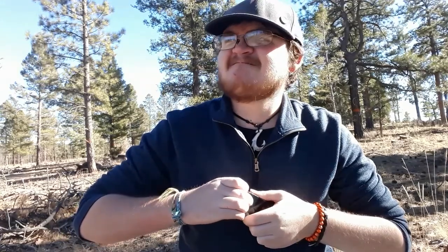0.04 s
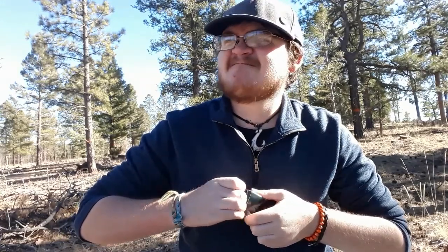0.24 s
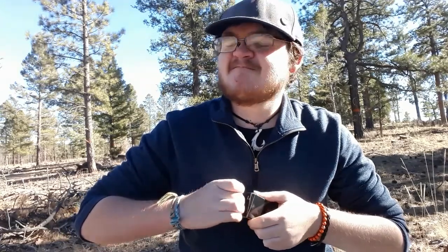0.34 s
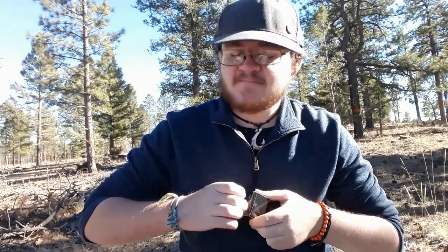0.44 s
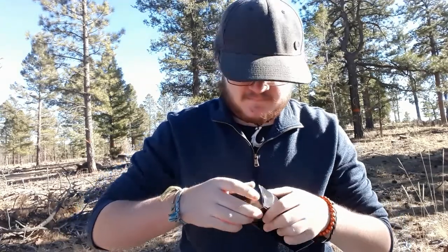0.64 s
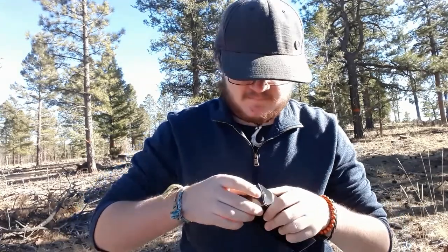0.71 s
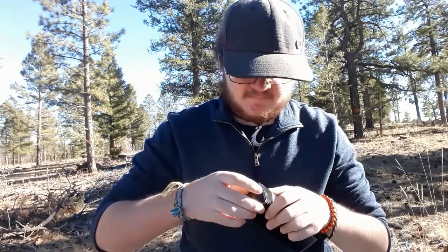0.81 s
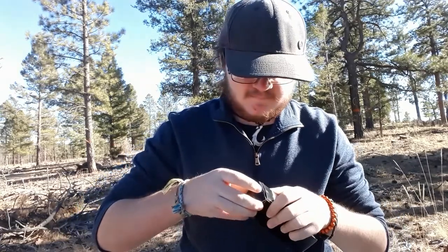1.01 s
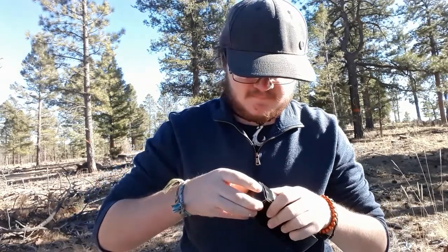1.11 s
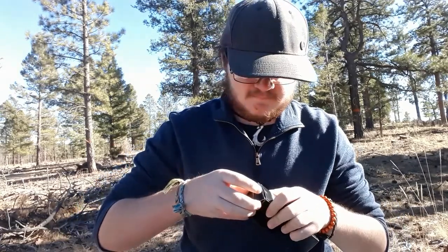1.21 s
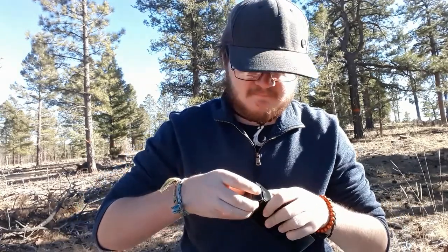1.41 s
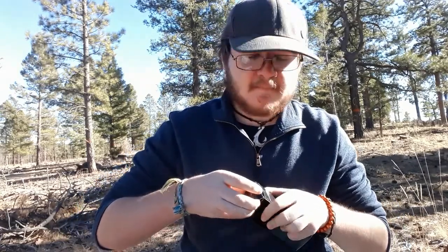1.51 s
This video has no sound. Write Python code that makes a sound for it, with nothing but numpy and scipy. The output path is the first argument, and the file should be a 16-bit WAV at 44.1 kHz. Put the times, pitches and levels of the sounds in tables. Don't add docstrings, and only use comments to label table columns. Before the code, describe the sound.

Fingers pry a little metal tin at arm's length outdoors: one crisp snap, a rapid clatter with a hard pop, a long lull with light wind rumble and thin hiss, then a last softer tinny snap.

```python
import sys
import numpy as np
from scipy import signal
from scipy.fft import rfft, irfft, next_fast_len
from scipy.io import wavfile
from scipy.ndimage import uniform_filter1d, map_coordinates

SR = 44100
rng = np.random.default_rng(int(sys.argv[2]) if len(sys.argv) > 2 else 0)


def transcribe(signal):
    frames = np.atleast_2d(signal).T
    limited = np.clip(frames, -1, 1)
    pcm = np.round(limited * 32767).astype(np.int16)
    wavfile.write(sys.argv[1], SR, pcm)


def invert_db(x):
    u = np.asarray(x, float) / 20
    return 10 ** u


N = 68355

# (time [s], peak [dB], low mode [Hz], second mode re low [dB], hold [s])
PANEL_FLEXES = [(.0600, -57, 943, -1, .003), (.0660, -61.5, 950, -21, .013),
                (.1780, -53.5, 1050, -12.5, .003), (.1925, -55.5, 1080, -11.5, .004),
                (.2105, -23.5, 1130, -20, .003), (0.2149, -22, 1194, -8.5, .005),
                (.2250, -25, 4700, -31, .002), (0.2368, -23.5, 980, 10, 0.0023),
                (0.2372, -23, 538, -20.5, 0.0056), (0.2235, -34.5, 1030, 5.5, .005),
                (.2465, -34.5, 1059, 8, .002), (.2400, -4.5, 963, -9, .0023),
                (.2685, -18.5, 1030, -11, .002), (.2720, -32, 1022, -1, .002),
                (.7672, -69, 763, 11.5, .004), (1.4822, -52.5, 640, -14.5, .001)]
# (time [s], level [dB], free ring [s], bare crack [dB])
NAIL_SNAPS = [
    (.0828, 7.5, 0.0054, -40),
    (1.5053, -7, 0.0073, -38.5),
]
# (frequency [Hz], width [Hz], level [dB])
SNAP_GRIP_MODES = [
    [(640, 300, -16), (950, 68, 0), (1130, 90, -5.5), (1880, 51, 3), (2530, 120, -12), (3335, 125, -24),
     (5550, 270, -21.5), (7380, 220, -23), (8600, 900, -33), (10600, 800, -28), (12200, 700, -29.5),
     (13500, 1000, -28)],
    [(624, 150, -10.5), (900, 96, 1), (1200, 200, -15.5), (1463, 90, -2), (1770, 67, 1), (2170, 124, -5),
     (2770, 130, -8), (3080, 165, -6), (4850, 300, -13), (5850, 300, -22), (7200, 500, -21),
     (11500, 2920, -40)],
]
# (time [s], length [s], level [dB], tilt [dB/octave], tuning of gripped tin [ratio])
RIM_STROKES = [(.059, 0.031, -66, -2.5, 0.55), (.088, 0.039, -65, -1.5, 1.06),
               (.203, 0.0043, -45, -1, 0.92), (.2075, 0.0067, -39.5, 2, 0.89),
               (.2148, 0.0096, -29, 0.5, 0.92), (0.219, 0.01, -26.5, 1.5, 1.01),
               (.2285, 0.0033, -39.5, 4, 0.84), (.2355, 0.0091, -18, -1.5, .99),
               (.2440, .006, -31.5, 0, 1.2), (.2490, .015, -44, -2.5, .95), (0.2662, .006, -38.5, 1.5, 1.1),
               (.2710, .012, -47.5, -18, .99), (.274, 0.074, -66.5, 1, 1.01), (.385, .006, -75.5, 4, 0.6),
               (.467, .006, -68.5, 0, .87), (.50, .03, -76, 2, 0.96), (.640, 0.0118, -71.5, 0, 0.87),
               (.7690, 0.0058, -62.5, 3, 0.79), (1.197, 0.0066, -72.5, 1.5, .85),
               (1.443, .01, -70.5, 1, 0.91), (1.484, .018, -68.5, 3.5, 0.8), (1.507, .09, -64.5, 1, 0.88),
               (1.528, 0.0013, -60, 4, 2.1)]
# (frequency [Hz], width [Hz], level [dB])
TIN_MODES = [(523, 250, -11.5), (1020, 263, 0), (2066, 190, 2.5), (2600, 190, -6.5), (3370, 180, -7),
             (4700, 404, -11), (6500, 490, -15.5), (7800, 500, -23), (10600, 900, -26.5),
             (12415, 1200, -25), (14960, 1500, -27.5)]
# (time [s], peak [dB], frequency [Hz])
HAND_PUSHES = [
    (.0005, -48.5, 120),
    (.165, -47, 90),
    (0.2414, -39, 260),
    (.241, -42.5, 159.6),
    (0.268, -41, 291.1),
    (0.276, -42.5, 378),
    (0.292, -53, 333),
    (.325, -60, 350),
    (.792, -45.5, 115),
    (0.798, -61, 300.3),
]
# (frequency [Hz], T60 [s])
WOOD_T60 = [(200, 0.61), (600, .25), (1500, 0.12), (4000, .18), (12000, .2)]
# (time [s], rumble level [dB])
BREEZE_LEVEL = [(0.0, -43), (0.038, -59), (0.184, -52), (0.198, -59.5), (0.236, -51), (0.426, -75.5),
                (0.456, -58), (0.578, -66), (0.694, -55.5), (0.728, -70.5), (0.806, -50), (0.858, -67),
                (0.892, -61), (1.208, -60.5), (1.242, -68), (1.324, -60), (1.466, -69), (1.55, -66)]
# (frequency [Hz], density [dB/Hz])
RUMBLE_SPECTRUM = [(12, -46.5), (20, -16), (67, -2), (102, -3.5), (137, -10), (155, -17.5), (205, -31.5),
                   (260, -22), (340, -53.5), (570, -120)]
# (frequency [Hz], density [dB/Hz])
HISS_MID_SPECTRUM = [(120, -37.5), (200, -6), (509, -4), (647, -8), (821, -9), (1210, -11), (5130, -18.5),
                     (14100, -12.5), (16000, -18)]
# (frequency [Hz], density [dB/Hz])
HISS_SIDE_SPECTRUM = [(120, -46), (200, -8.5), (263, -4.5), (347, -4.5), (986, -8), (7400, -18.5),
                      (8200, -30), (16000, -31)]

QUENCH_T60_S = .009


def unit(x):
    return x / np.sqrt(np.mean(x ** 2) + 1e-20)


def along(points, hz):
    f, v = np.transpose(points)
    return np.interp(np.log(hz + 1), np.log(f + 1), v)


def filtered(x, response):
    m = next_fast_len(x.shape[-1] + 8192)
    spectrum = rfft(x, m) * response(np.fft.rfftfreq(m, 1 / SR))
    return irfft(spectrum, m)[..., :x.shape[-1]]


def resonant(x, modes, tilt_db=0):
    def response(f):
        total = 0
        for k, (hz, width_hz, db) in enumerate(modes):
            gain = (-1) ** k * invert_db(db + tilt_db * np.log2(hz / 1e3))
            damping = 1j * f * width_hz
            total = total + gain * damping / (hz * hz - f * f + damping)
        return total
    return filtered(x, response)


def noise(spectrum):
    return unit(filtered(rng.standard_normal(N), lambda hz: invert_db(along(spectrum, hz))))


def wobble(rate_hz):
    knots = rng.standard_normal(int(N * rate_hz / SR) + 4)
    return map_coordinates(knots, [np.arange(N) * rate_hz / SR])


def add(track, time_s, x):
    part = track[round(time_s * SR):][:len(x)]
    part += x[:len(part)]


def flexes():
    mode_ratio, rise_share = 2.05, .35
    linger_db, linger_t60_s = -32, .04
    out, t = np.zeros(N), np.arange(SR // 10) / SR
    for time_s, db, hz, second_db, hold_s in PANEL_FLEXES:
        after = np.maximum(t - hold_s, 0)
        swell = 1 - np.exp(-t / (rise_share * hold_s))
        decay = invert_db(-60 * after / QUENCH_T60_S) + invert_db(linger_db - 60 * after / linger_t60_s)
        low = np.sin(2 * np.pi * hz * t)
        second = invert_db(second_db) * np.sin(2 * np.pi * mode_ratio * hz * t)
        add(out, time_s, invert_db(db) * swell * decay * (low + second))
    return out


def snaps():
    residue_db, crack_t60_s = -13.5, 0.0042
    out, t = np.zeros(N), np.arange(SR // 20) / SR
    for (time_s, db, free_s, crack_db), modes in zip(NAIL_SNAPS, SNAP_GRIP_MODES):
        after = np.maximum(t - free_s, 0)
        ring = resonant(t == 0, modes) * (invert_db(-60 * after / QUENCH_T60_S) + invert_db(residue_db))
        crack = invert_db(crack_db - 60 * t / crack_t60_s) * rng.standard_normal(len(t))
        add(out, time_s, invert_db(db) * (ring + crack))
    return out


def slips():
    rate_hz, scatter_db = 9000, 3
    out, t = np.zeros(N), np.arange(SR // 10) / SR
    for time_s, length_s, db, tilt_db, tuning in RIM_STROKES:
        chance, sign, size = rng.random((3, len(t)))
        grit = (chance < rate_hz / SR) * np.sign(sign - .5) * invert_db(-scatter_db * np.log(size + 0.03))
        rise = t / min(.3 * length_s, .003)
        fall = (length_s - t) / (.6 * length_s)
        grit = grit * np.clip(np.minimum(rise, fall), 0, 1)
        ring = resonant(grit, np.array(TIN_MODES) * [tuning, 1, 1], tilt_db)
        add(out, time_s, invert_db(db) * ring * np.sqrt(length_s * SR / (np.sum(ring ** 2) + 1e-20)))
    return out


def pushes():
    cycles = 1.5
    out, t = np.zeros(N), np.arange(SR // 10) / SR
    for time_s, db, hz in HAND_PUSHES:
        u = t * hz / cycles
        swell = np.e * 2 * u * np.exp(-2 * u)
        add(out, time_s, invert_db(db) * swell * np.sin(2 * np.pi * hz * t))
    return out


def wood(x):
    hz, t, z = signal.stft(rng.standard_normal((2, SR // 3)), SR, nperseg=256)
    decay = invert_db(-60 * t / along(WOOD_T60, hz)[:, None])
    tail = signal.istft(z * decay, SR, nperseg=256)[1]
    tail = tail / np.linalg.norm(tail[0])
    delayed = np.pad(x, (130, 0))[None]
    return signal.fftconvolve(delayed, tail, axes=1)[:, :N]


def gust():
    lumps_db, steady = 2, int(.07 * SR)
    x = invert_db(lumps_db * wobble(44)) * noise(RUMBLE_SPECTRUM)
    power = uniform_filter1d(uniform_filter1d(x * x, size=steady), size=steady)
    return unit(x / np.sqrt(np.abs(power) + .05))


def breeze():
    side_db, side_swing = 2.5, 0.34
    time_s, db = np.transpose(BREEZE_LEVEL)
    mid_db = np.interp(np.arange(N) / SR, time_s, db)
    mid = gust() * invert_db(mid_db)
    side = gust() * invert_db(db.mean() + side_swing * (mid_db - db.mean()) + side_db)
    return np.array([mid + side, mid - side])


def hiss():
    mid = invert_db(-68) * noise(HISS_MID_SPECTRUM)
    side = invert_db(-71.5) * noise(HISS_SIDE_SPECTRUM)
    return np.array([mid + side, mid - side])


def scene():
    pan_db, wide_db, wood_db = 0.13, 0, -27.5
    tin = flexes() + slips() + snaps()
    direct = (tin + pushes()) * invert_db([[pan_db], [-pan_db]])
    apart = invert_db(wide_db) * filtered(tin, lambda hz: 1j * (hz + 900) / (hz + 9000)) * [[1], [-1]]
    tail = invert_db(wood_db) * wood(filtered(tin, lambda hz: 1 + 1j * hz / 5000))
    return direct + apart + tail + breeze() + hiss()


def band_limit(x):
    return signal.sosfilt(signal.butter(12, 16690, fs=SR, output="sos"), x)


def record(dry):
    top_hz, shelf_hz, shelf_db = 16500, 15800, -22

    def below(hz, edge_hz):
        return np.clip((edge_hz - hz) / 300 + .5, 0, 1)

    def band(hz):
        return below(hz, top_hz) * invert_db(shelf_db * (1 - below(hz, shelf_hz)))
    return band_limit(filtered(dry, band))


dry = scene()
out = record(dry)
transcribe(out)
```